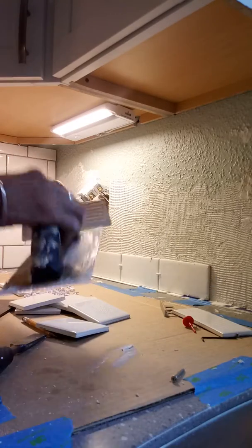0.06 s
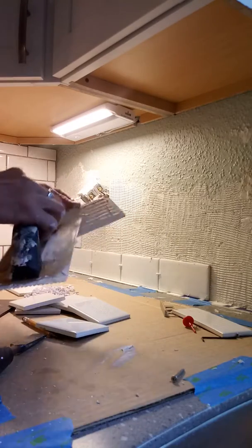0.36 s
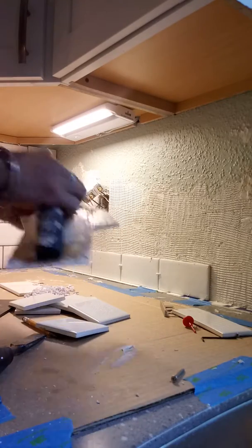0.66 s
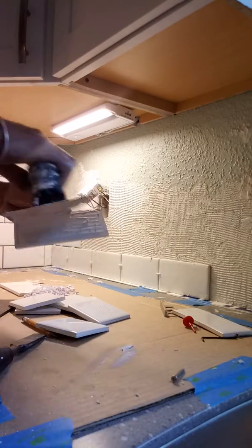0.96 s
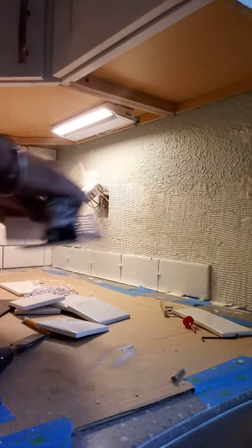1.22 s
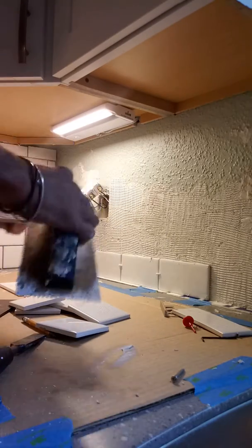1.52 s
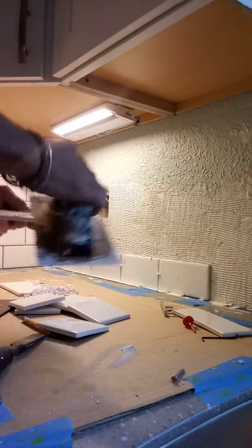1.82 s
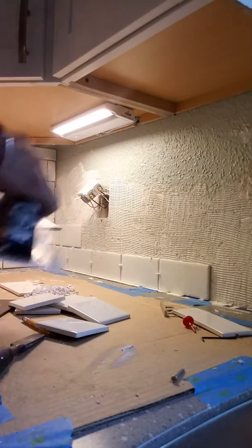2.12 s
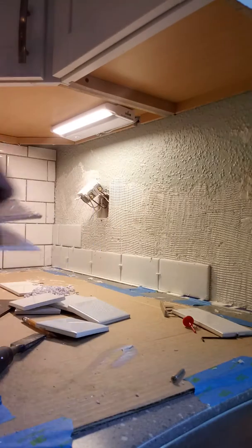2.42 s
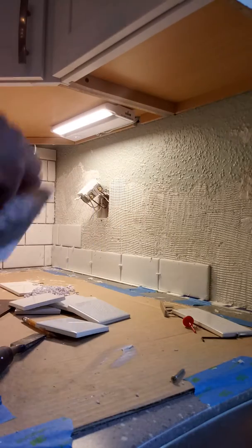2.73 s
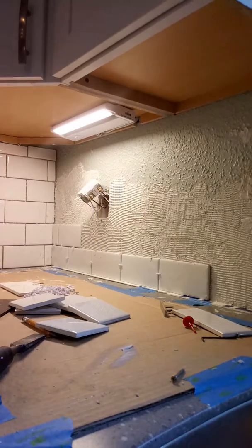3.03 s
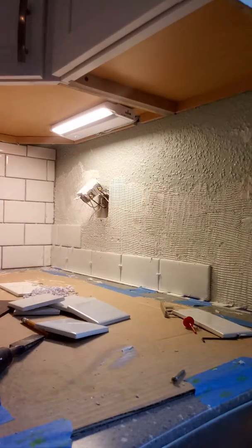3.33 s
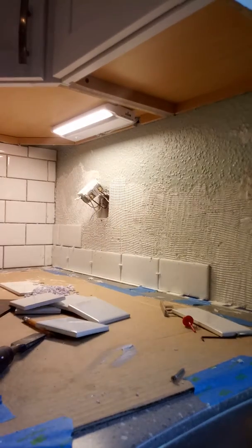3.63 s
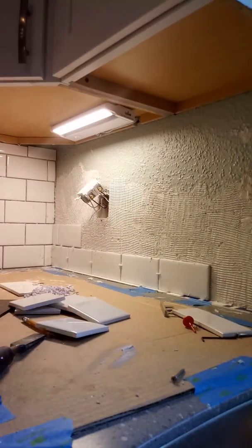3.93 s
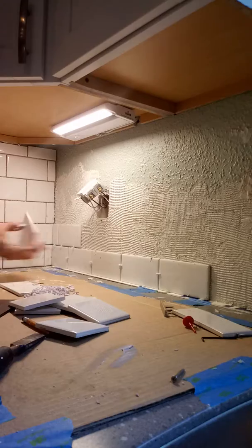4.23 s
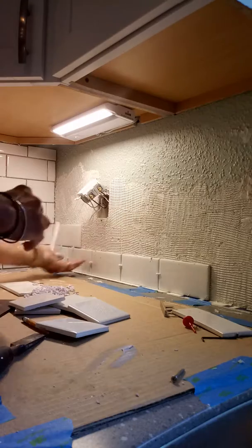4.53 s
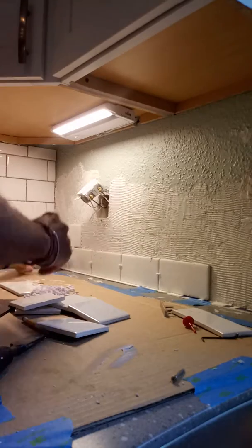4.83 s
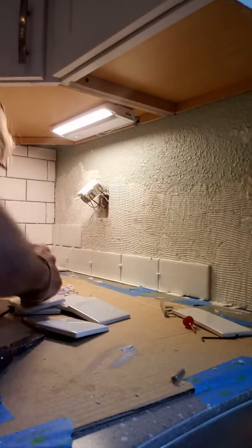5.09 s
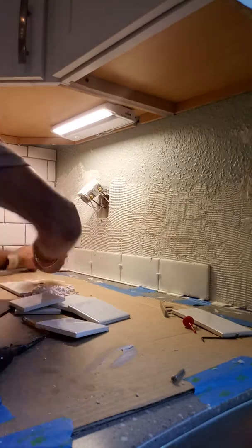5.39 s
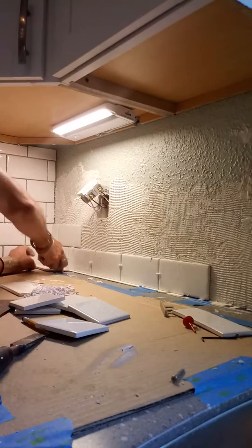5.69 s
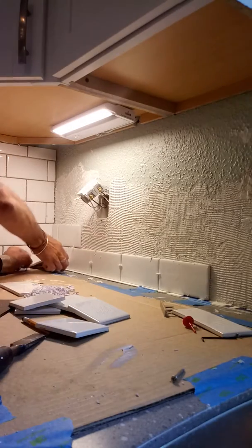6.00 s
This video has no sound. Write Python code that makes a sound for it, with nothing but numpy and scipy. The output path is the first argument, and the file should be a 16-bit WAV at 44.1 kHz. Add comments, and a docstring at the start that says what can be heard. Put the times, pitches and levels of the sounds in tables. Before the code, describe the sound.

For the first three seconds, two steel trowels tap together and scrape each other in short, irregular strokes, with a gritty hiss, a thin metallic ring and a tiny squeak around 2.4 seconds. After a brief lull and a small bangle clink, one trowel is put down at about 3.6 seconds, rattling to rest with a loud clank. Bangles jingle and soft thuds land on a board around 4.3 seconds. At 4.6 and 4.8 seconds a ceramic tile clacks loudly on another, falls flat and rocks quickly. Tiles scuff over the dusty board from 5 to 5.7 seconds, with one soft knock. From about 5.8 seconds to the end, a tile is tapped into place with a few dull, hollow knocks. Faint bangle jingles accompany the movements. Everything sounds near, in a quiet room with a low rush of air and short reverberation.

```python
"""Over a kitchen counter two steel trowels tap together and scrape each other clean: stick-slip friction hisses
and rings the thin blades. One is then put down and rattles to rest with a clank. Next, ceramic tiles scuff over
the dusty board; twice one clacks on another, falls flat and rocks. Last, a tile is tapped into place.
Throughout, bangles jingle faintly on the wrist, and once a tile clinks lightly; the tiled alcove and the bare,
quiet room reflect each contact."""
import sys
import numpy as np
from scipy import signal
from scipy.fft import rfft, irfft, next_fast_len
from scipy.io import wavfile
from scipy.ndimage import uniform_filter1d, map_coordinates

SR = 44100
rng = np.random.default_rng(int(sys.argv[2]) if len(sys.argv) > 2 else 0)


def unload_wav(signal):
    """Save mono or channel-first audio to the path in sys.argv[1] as 16-bit WAV at rate SR, clipped to [-1, 1]."""
    wavfile.write(
        sys.argv[1],
        SR,
        np.round(np.clip(np.atleast_2d(signal).T, -1, 1) * 32767).astype(np.int16),
    )


N = 271215

# broad spectra of the sources and the room's tail: frequency_hz, relative_level_db
AIR_SPECTRUM = [(15, -59), (25, -20), (137, -7), (242, 2), (326, -9), (641, -11.5), (796, -16), (1040, -12),
                (1480, -16), (2110, -17.5), (3920, -33), (5570, -23), (8360, -23.5), (12200, -40.5),
                (16000, -23)]
ROOM_SPECTRUM = [(100, -7), (500, 2.5), (1500, 1), (4000, -3.5), (8000, -7.5), (15000, 3.5)]
CLINK_SPECTRUM = [(300, -44), (1500, -24.5), (3000, -21.5), (4000, -25), (8000, -12), (11000, -52)]
THUD_SPECTRUM = [(25, -18), (50, -24.5), (85, -11), (115, -1.5), (170, 0.5), (260, -3), (330, -19),
                 (700, -23.5), (3000, -90)]
WOOD_SPECTRUM = [(60, -49), (200, -12), (310, -4), (390, 2), (500, 3), (620, 0), (800, -3.5), (1400, -9.5),
                 (2400, -16.5), (4000, -38.5), (9000, -44), (16000, -71)]
TILE_SPECTRUM = [(150, -26), (800, -7), (1800, -5.5), (3500, -9.5), (5000, -22.5), (8500, -21),
                 (11000, -55), (16000, -36)]
PLATE_SPECTRUM = [(100, -26), (400, -19.5), (1000, -7.5), (3000, -8), (4200, -30), (5500, -11.5),
                  (6500, -4.5), (8500, -8), (10000, -34.5), (16000, -42)]
GRIT_SPECTRUM = [(300, -47), (1200, -23), (2800, -0.5), (4400, -13.5), (6500, -0.5), (8600, 0), (10500, -8),
                 (13000, -15), (15500, -5)]
FLEX_SPECTRUM = [(50, -28), (150, -1.5), (300, -10), (420, 0.5), (700, 0.5), (1500, -5), (2500, -14.5),
                 (4000, -17), (8000, -36), (16000, -60)]
BLADE_SPECTRUM = [(100, -33.5), (300, -18.5), (520, -23.5), (800, -15), (1200, -7.5), (2300, -3.5),
                  (3200, -12), (4200, -18), (8000, -14), (16000, -84)]
# normal modes of the struck bodies: frequency_hz, bandwidth_hz, relative_level_db
CLINK_MODES = [(3290, 26, -16), (4800, 16, -5), (5770, 39, 3.5), (6300, 42, -1), (7670, 37, 2),
               (8100, 40, -9.5), (8635, 26, -18)]
JINGLE_MODES = [(8530, 110, 2), (8850, 200, -3.5), (10530, 230, -10), (12300, 120, -6), (14500, 160, -1),
                (14600, 220, -7.5)]
HOLLOW_MODES = [(480, 31, 4.5), (720, 53, 0.87)]
TILE_MODES = [(1186, 9.1, 17), (2140, 79, 2), (2510, 150, 0), (3338, 9.6, 5), (4710, 27, -1), (5600, 61, 2),
              (6280, 55, 10), (7670, 13, 6.5), (8670, 50, 2)]
PLATE_MODES = [(1070, 27, -4), (1244, 93, -0.5), (1380, 30, -1), (1590, 35, 2.5), (1668, 35, 2),
               (2200, 110, -12), (2880, 50, -0.5), (3365, 122, 4), (4965, 110, 0), (6010, 97, 0),
               (6560, 140, -3), (7000, 200, -15), (8000, 54, 4.5), (8232, 29, 5), (8370, 39, 5.5),
               (8950, 32, 6.5)]
EDGE_MODES = [(10600, 50, -3), (11060, 140, 4), (12900, 46, -13), (13800, 60, -10), (14500, 110, 1),
              (15600, 98, 1)]
FLICK_MODES = [(163, 20, 6.8), (503.3, 7, 24), (1120, 16, 6), (2175, 20, 14)]
FLEX_MODES = [(591, 41, -1), (835, 31, -3), (1100, 41, 8), (1330, 85, 0.5), (1470, 71, 3.5)]
BLADE_MODES = [(498.3, 7.5, 3.5), (693, 6.7, -2.5), (1019, 6.8, 4), (1124, 10, 3.5), (1307, 24, 1.5),
               (1500, 42, 1.5), (1563, 21, 0.5), (1680, 30, -0.5), (1810, 19, -0.5), (2060, 45, -2),
               (2130, 26, 8), (2410, 60, -9), (2720, 21, -16), (3220, 54, -9)]
# reverberation time of the room: frequency_hz, t60_s
ROOM_DECAY = [(100, 0.68), (400, 0.6471), (1100, 0.53), (2800, 0.67), (7000, 0.6), (15000, 0.01)]
# the arm moves: start_s, end_s
ARM_MOVES = [(0, 2.9), (4.3, 7)]
# light clinks and bangle jingles: start_s, clink_db, jingle_db; a tile clinks once at 3.39 s, elsewhere the
# clink is faint
CLINKS_AND_JINGLES = [(.125, -60, -53), (2.068, -55, -46.5), (3.39, -32, -49), (4.239, -54, -37),
                      (4.248, -47, -32.5), (4.744, -71, -50), (5.13, -56, -56), (5.391, -65, -57)]
# things are set on the board: start_s, thud_db, knock_db
KNOCKS = [(2.255, -45, -46.5), (3.62, -38, -45.5), (3.66, -48, -38.5), (3.876, -51, -40.5),
          (4.329, -27.5, -39), (4.395, -29, -41), (5.442, -28, -42)]
# things slide over the board: start_s, t60_s, hiss_db, rasp_db
SCUFFS = [(4.327, 0.084, -31.5, -38), (4.393, 0.1, -39.5, -44.5), (4.98, 0.64, -37.5, -36.5),
          (5.287, 0.46, -47, -45), (5.433, 0.091, -36.5, -35.5), (5.451, .26, -27.5, -41)]
# a tile is tapped into place: start_s, thud_db, knock_db, ring_db
TILE_TAPS = [(5.785, -21, -26, -49), (5.906, -51, -29, -52), (6.0, -30.5, -32.5, -38),
             (6.056, -31.5, -27.5, -46)]
# a tile strikes another and falls flat: start_s, clack_db, fall_s, landing_db
CLATTERS = [(4.552, -22.5, .036, -18), (4.794, -18, .052, -14.5)]
# the trowel lands: start_s, t60_s, plate_db, edge_db
CLANKS = [(3.62, .1, -41.5, -57), (3.653, .08, -18, -56), (3.682, 0.054, -25, -53),
          (3.705, 0.045, -19.5, -33), (3.712, .53, -14, -31)]
# an edge sticks and squeaks: start_s, pitch_hz, level_db
SQUEAKS = [(2.374, 3300, -36.5), (5.721, 3770, -46)]
# the edge catches on a coarse grain: start_s, level_db
CATCHES = [(0.377, -29), (1.13, -30.5), (1.144, -31), (1.159, -24.5), (2.373, -30), (2.436, -31)]
# blade slides along blade: start_s, length_s, hiss_db, tip_ring_db, swell_db
STROKES = [(.32, .17, -37.5, -37.5, 8), (.722, .083, -27, -22, 30.5), (1.11, .099, -29.5, -22, 20),
           (1.962, 0.039, -37, -37, 2), (2.319, .04, -36.5, -62, 2), (2.356, 0.15, -39.5, -44.5, -1),
           (2.85, 0.086, -32.5, -27.5, 13), (4.465, 0.1, -47.5, -50, 1)]
# the blades meet: start_s, ring_db, tick_db, flex_db; the first row, at 0 s, is the blade already ringing as
# the scene opens
BLADE_TAPS = [(0, -28, -52, -40.5), (.268, -49.5, -50, -63), (0.665, -51.5, -40.5, -68),
              (1.046, -27.5, -28.5, -37), (1.443, -23.5, -50, -47), (1.452, -22.5, -28.5, -28),
              (1.867, -32.5, -37, -27), (2.018, -36.5, -37.5, -37.5), (2.241, -63, -46.5, -50),
              (2.743, -41.5, -46, -40), (2.772, -41, -39, -28.5)]


def amp(db):
    """Amplitude ratio of a level in decibels."""
    return 10 ** (np.asarray(db) / 20)


def unit_rms(x):
    """Normalisation to a mean square of 1."""
    return x / np.sqrt(np.mean(x ** 2) + 1e-20)


def curve_at(points, hz):
    """Interpolation on a logarithmic frequency axis."""
    knots_hz, values = np.transpose(points)
    return np.interp(np.log(hz + 1), np.log(knots_hz + 1), values)


def wobble(knots_per_s):
    """Random modulation: straight lines between Gaussian values."""
    knots = rng.standard_normal(int(N * knots_per_s / SR) + 4)
    return map_coordinates(knots, [np.arange(N) * knots_per_s / SR], order=1)


def scattered(start, end, per_s):
    """Stratified sampling: one random moment in each equal slot of time."""
    count = max(1, round((end - start) * per_s))
    return start + (end - start) * (np.arange(count) + rng.random(count)) / count


def body(spectrum=None, modes=(), size=16384):
    """Modal superposition: resonances over a broad spectrum, as a unit-energy impulse response."""
    hz = np.fft.rfftfreq(size, 1 / SR)
    power = amp(curve_at(spectrum, hz)) ** 2 if spectrum else 0
    for centre, width, db in modes:
        damping = (hz * width) ** 2
        power = power + amp(db) ** 2 * damping / ((centre ** 2 - hz ** 2) ** 2 + damping)
    # folding the cepstrum gives a causal, minimum-phase response
    cepstrum = irfft(np.log(power + 1e-10) / 2)
    cepstrum[1:size // 2] *= 2
    cepstrum[size // 2 + 1:] = 0
    response = irfft(np.exp(rfft(cepstrum)))
    return response / np.linalg.norm(response)


def through(x, response):
    """Linear filtering by convolution, cut to the scene's length."""
    return signal.fftconvolve(x, response)[:N]


def impacts(times, levels_db, t60_s, response):
    """Impact excitation: decaying chatter drives a body; a level is its energy spread over 10 ms."""
    out, t = np.zeros(N + 2 * SR), np.arange(SR // 2) / SR
    for start, db, t60 in np.broadcast(times, levels_db, t60_s):
        chatter = rng.standard_normal(len(t)) * amp(-60 * t / t60)
        hit = signal.fftconvolve(chatter, response)
        hit *= np.sqrt(SR / 100) / np.linalg.norm(hit)
        out[round(abs(start) * SR):][:len(hit)] += amp(db) * hit
    return out[:N]


def air(level_db=-55):
    """Ambient noise: the faint, stationary rush of the room."""
    return amp(level_db) * unit_rms(through(rng.standard_normal(N), body(AIR_SPECTRUM)))


def in_room(x, alcove_db, room_db, alcove_t60=0.067, build_s=0.0049):
    """Reverberation: direct sound, early reflections under the cabinets, then a diffuse tail."""
    hz, t, noise = signal.stft(rng.standard_normal(SR), SR, nperseg=256)
    t60 = curve_at(ROOM_DECAY, hz)[:, None]
    decay = amp(-60 * t / t60) * np.sqrt(np.log(1e6) / (t60 * SR))
    colour = amp(curve_at(ROOM_SPECTRUM, hz))[:, None]
    tail = signal.istft(noise * decay * colour, SR, nperseg=256)[1]
    t = np.arange(len(tail)) / SR
    early = rng.standard_normal(len(t)) ** 3 * amp(-60 * t / alcove_t60) * (t > .002)
    early = amp(alcove_db) * early / np.linalg.norm(early)
    late = amp(room_db) * tail * (1 - np.exp(-t / build_s))
    return x + through(x, early + late)


def clinks_and_bangles(clink_t60=.03, jingle_t60=0.063, stir_db=-63.5):
    """Free vibration of thin metal rings, which collide as the wrist turns and the arm moves; among them a tile
    clinks lightly once."""
    start, clink_db, jingle_db = np.transpose(CLINKS_AND_JINGLES)
    ring = body(modes=JINGLE_MODES)
    clinks = impacts(start, clink_db, clink_t60, body(CLINK_SPECTRUM, CLINK_MODES))
    jingles = impacts(start, jingle_db, jingle_t60, ring)
    stir_times = np.concatenate([scattered(*move, per_s=6) for move in ARM_MOVES])
    stirs = impacts(stir_times, rng.normal(stir_db, 2.3, len(stir_times)), jingle_t60, ring)
    return in_room(clinks + jingles + stirs, alcove_db=-1, room_db=0.5)


def counter(thud_t60=0.17, knock_t60=0.11):
    """Impact and sliding friction: the board thuds under the work, and its dust rasps."""
    start, thud_db, knock_db = np.transpose(KNOCKS)
    thuds = impacts(start, thud_db, thud_t60, body(THUD_SPECTRUM))
    knocks = impacts(start, knock_db, knock_t60, body(WOOD_SPECTRUM))
    start, t60, hiss_db, rasp_db = np.transpose(SCUFFS)
    hiss = impacts(start, hiss_db, t60, body(GRIT_SPECTRUM))
    rasp = impacts(start, rasp_db, t60, body(TILE_SPECTRUM))
    board = in_room(thuds + knocks, alcove_db=2.5, room_db=-2.0)
    return board + in_room(hiss + rasp, alcove_db=-10, room_db=-1)


def tile_taps(thud_t60=0.12, knock_t60=0.074, ring_t60=0.017):
    """Damping: the hand mutes a tile as it is tapped into place at the foot of the wall."""
    start, thud_db, knock_db, ring_db = np.transpose(TILE_TAPS)
    thuds = impacts(start, thud_db, thud_t60, body(THUD_SPECTRUM))
    knocks = impacts(start, knock_db, knock_t60, body(WOOD_SPECTRUM, HOLLOW_MODES))
    ring = impacts(start, ring_db, ring_t60, body(TILE_SPECTRUM, TILE_MODES))
    return in_room(thuds + knocks + ring, alcove_db=-13.5, room_db=-3.0)


def tile_clatter(clack_t60=0.019, ring_t60=0.079, rock_t60=0.15, rock_s=.06, shrink=0.94, loss_db=6):
    """Inelastic collision: a tile clacks edge-on, falls flat, then rocks ever faster and weaker."""
    # a flat landing favours the low modes by 6 dB an octave
    softened = [(hz, width, db - 6 * np.log2(hz / 2000)) for hz, width, db in TILE_MODES]
    edge, flat = body(TILE_SPECTRUM, TILE_MODES), body(TILE_SPECTRUM, softened)
    wood, thud = body(WOOD_SPECTRUM), body(THUD_SPECTRUM)
    ring, board, rocks = np.zeros(N), np.zeros(N), np.arange(5)
    for start, clack_db, fall_s, landing_db in CLATTERS:
        gaps = rock_s * shrink ** rocks
        rock_times = start + fall_s + np.cumsum(gaps) - gaps
        rock_db = landing_db - loss_db * rocks
        ring += impacts(start, clack_db, clack_t60, edge)
        ring += impacts(rock_times, rock_db - 6, ring_t60, flat)
        # every contact also drives the board beneath
        for times, db, t60 in [(start, clack_db - 4, clack_t60), (rock_times, rock_db, rock_t60)]:
            board += impacts(times, db, t60, wood) + impacts(times, db - 4.5, t60, thud)
    return in_room(ring, alcove_db=-8.5, room_db=1.5) + in_room(board, alcove_db=-11.5, room_db=-2.5)


def trowel_clank():
    """Plate vibration: the trowel lands on its handle, falls on its plate and buzzes to rest."""
    start, t60, plate_db, edge_db = np.transpose(CLANKS)
    plate = impacts(start, plate_db, t60, body(PLATE_SPECTRUM, PLATE_MODES))
    edge = impacts(start, edge_db, t60, body(modes=EDGE_MODES))
    return in_room(plate + edge, alcove_db=-11.5, room_db=-1.0)


def squeaks(width_hz=300, t60=0.036):
    """Friction-excited resonance: a sticking edge chirps in one narrow band."""
    chirps = sum(impacts(start, db, t60, body(modes=[(hz, width_hz, 0)])) for start, hz, db in SQUEAKS)
    return in_room(chirps, alcove_db=-9, room_db=-15)


def stick_slip(rough_db, catch_db):
    """Stick-slip force: tiny slips on sand grains, bunched into longer catches."""
    return unit_rms(rng.standard_normal(N) * amp(rough_db * wobble(1100) + catch_db * wobble(120)))


def wandering_contact(force, depth_db=4.0):
    """Spectral modulation: as the contact point wanders, brief resonances come and go."""
    spectra = signal.stft(force, nperseg=256)[2]
    field = uniform_filter1d(rng.standard_normal(spectra.shape), size=3, axis=0)  # across frequency
    field = uniform_filter1d(field, size=7, axis=1)  # across time
    return unit_rms(signal.istft(spectra * amp(depth_db * unit_rms(field)), nperseg=256)[1][:N])


def strokes(blade, grit, press_s=0.032, lift_share=0.17, light_db=-15.5, flick_t60=0.25, catch_t60=0.015):
    """Forced vibration: hiss follows pressure, and the ring swells as the edge nears the free tip."""
    t = np.arange(N) / SR
    hiss_gain, ring_gain = np.zeros(N), np.zeros(N)
    for start, length, hiss_db, ring_db, swell_db in STROKES:
        remaining = np.clip(1 - (t - start) / length, 0, 1)
        touching = (remaining > 0) & (remaining < 1)
        press = np.clip((t - start) / press_s, 0, 1)
        lift = np.minimum(1, remaining / lift_share)
        hiss_gain += touching * amp(hiss_db + light_db * (1 - np.minimum(press, lift)))
        ring_gain += touching * amp(ring_db + light_db * (1 - press) - swell_db * remaining)
    hiss = through(hiss_gain * wandering_contact(stick_slip(rough_db=3.5, catch_db=3.0)), grit)
    ring = through(ring_gain * stick_slip(rough_db=1.0, catch_db=2.0), blade)
    # the blade springs free at the tip, far louder after the hardest strokes
    start, length, _, ring_db, _ = np.transpose(STROKES)
    flick_db = -33.5 + 5.8 * (ring_db - ring_db.max())
    flicks = impacts(start + length, flick_db, flick_t60, body(FLEX_SPECTRUM, FLICK_MODES))
    catches = impacts(*np.transpose(CATCHES), catch_t60, grit)
    return hiss + ring + flicks + catches


def trowels(ring_t60=0.073, tick_t60=0.019, flex_t60=0.1):
    """Bending modes of thin steel, excited as the blades tap and drag over each other."""
    blade, grit = body(BLADE_SPECTRUM, BLADE_MODES), body(GRIT_SPECTRUM)
    flex = body(FLEX_SPECTRUM, FLEX_MODES)
    start, ring_db, tick_db, flex_db = np.transpose(BLADE_TAPS)
    ring = impacts(start, ring_db, ring_t60, blade)
    ticks = impacts(start, tick_db, tick_t60, grit)
    hollow_clacks = impacts(start, flex_db, flex_t60, flex)
    return in_room(ring + ticks + hollow_clacks + strokes(blade, grit), alcove_db=-6.5, room_db=-3.0)


def scene():
    """Superposition: the pressures of all sources add in one channel."""
    work = trowels() + squeaks() + trowel_clank() + tile_clatter() + tile_taps()
    return (work + counter() + clinks_and_bangles() + air())[None]


def record(dry, top_hz=16000):
    """Band limiting: an ideal low-pass filter keeps only what lies below top_hz."""
    size = next_fast_len(N + SR // 2)
    passband = np.fft.rfftfreq(size, 1 / SR) < top_hz
    return irfft(rfft(dry, size) * passband, size)[:, :N]


dry = scene()
out = record(dry)
unload_wav(out)
```